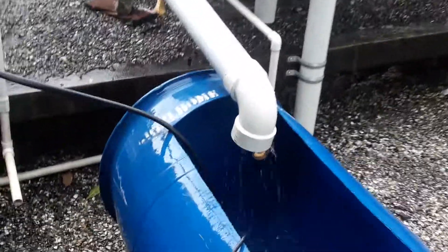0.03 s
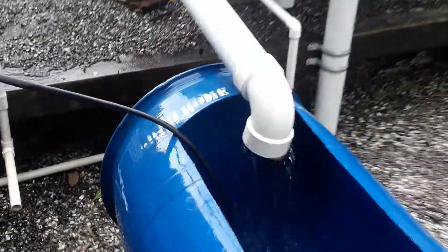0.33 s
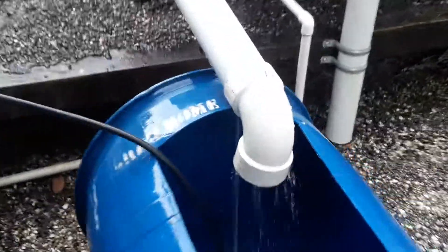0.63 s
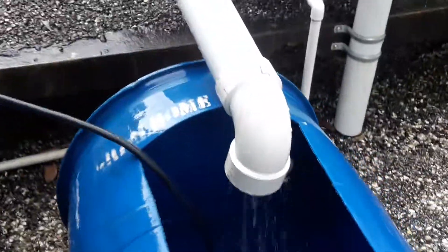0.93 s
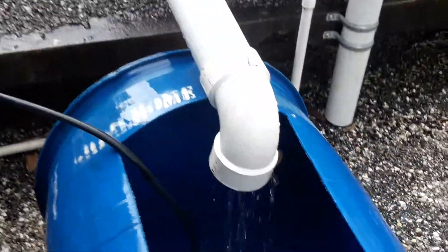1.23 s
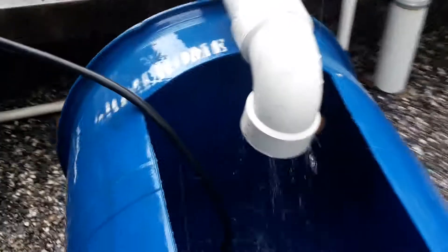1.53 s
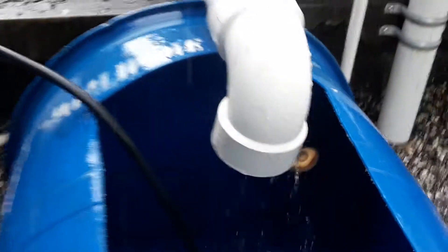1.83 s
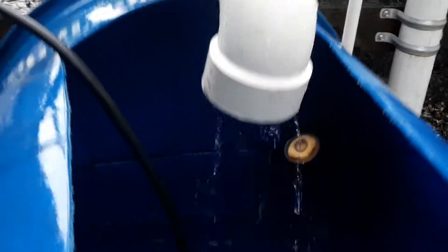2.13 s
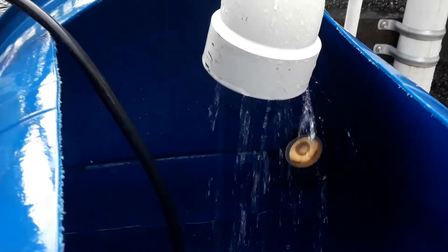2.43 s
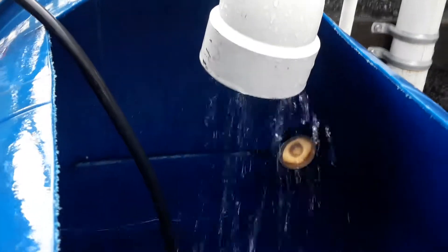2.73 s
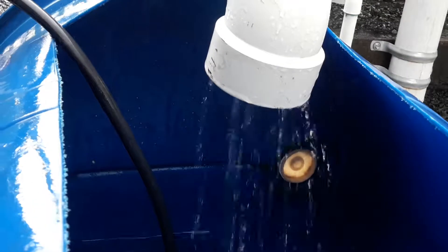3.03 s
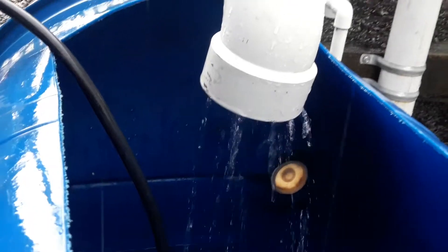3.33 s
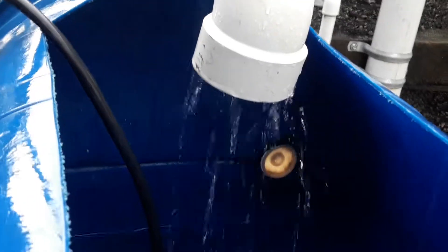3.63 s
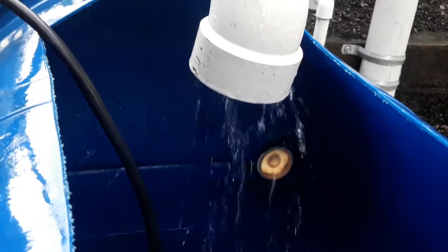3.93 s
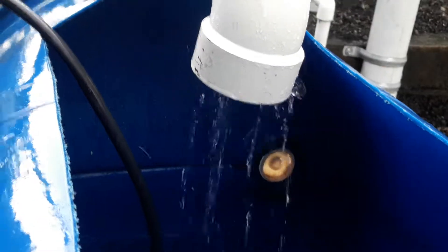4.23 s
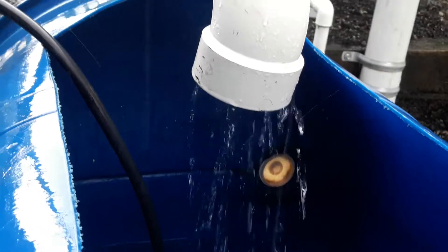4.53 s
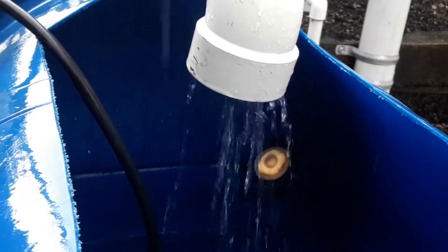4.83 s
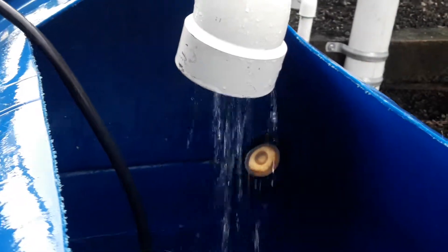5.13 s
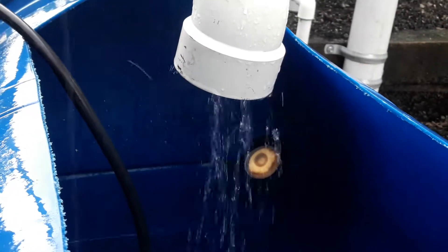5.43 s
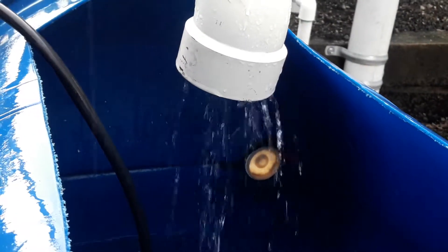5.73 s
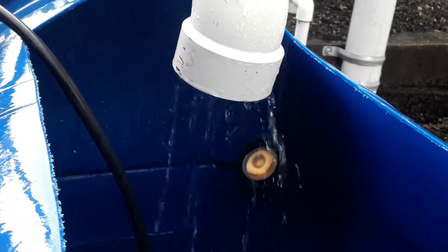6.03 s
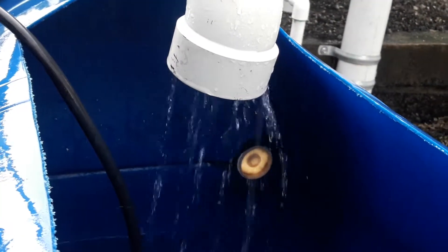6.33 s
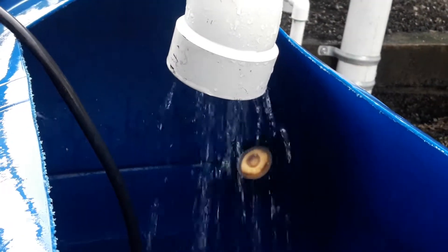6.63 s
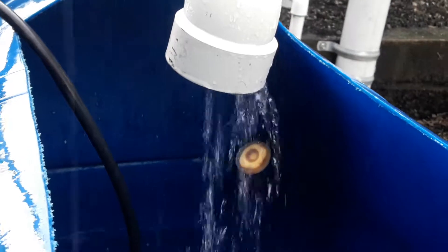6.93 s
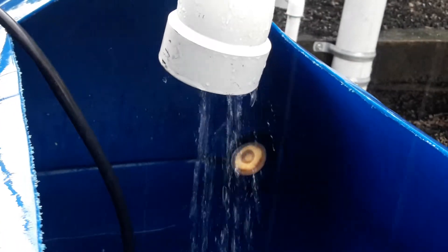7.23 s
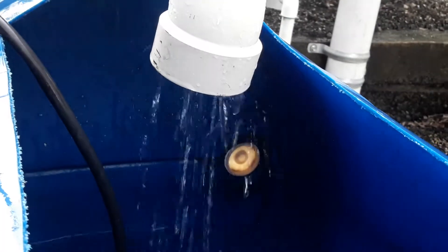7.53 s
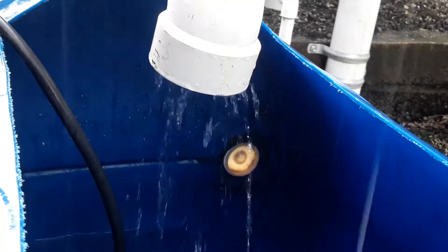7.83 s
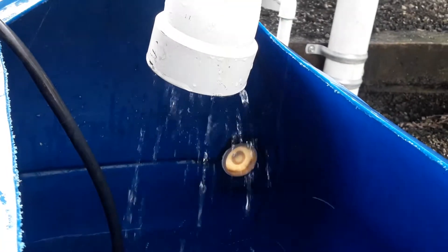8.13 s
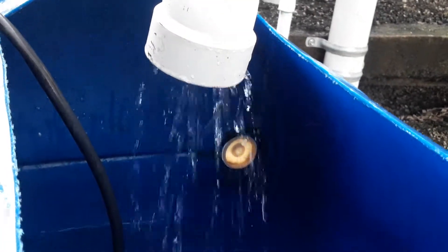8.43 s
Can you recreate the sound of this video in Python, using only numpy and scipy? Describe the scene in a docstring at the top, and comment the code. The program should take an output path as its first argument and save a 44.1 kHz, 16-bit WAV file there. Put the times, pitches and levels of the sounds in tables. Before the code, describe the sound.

Rainwater trickles from a pipe into a part-filled plastic barrel, a dense splashy patter with plinking drops and soft hollow drumming.

```python
"""At a part-filled plastic barrel, rainwater falls from a pipe in thin, broken strands.
Countless small splashes and bubbles patter between the walls, fat drops plink above them,
fine spray hisses and the barrel drums softly. A few drops knock on a camera close by;
after the hardest knock the whole sound sinks for a second and swells back."""
import sys
import numpy as np
from scipy import signal
from scipy.io import wavfile

SR = 44100
rng = np.random.default_rng(int(sys.argv[2]) if len(sys.argv) > 2 else 0)


def store_pcm(level_fs):
    """Save levels as 16-bit WAV."""
    pcm = np.round(np.clip(level_fs, -1, 1) * 32767).astype(np.int16)
    wavfile.write(sys.argv[1], SR, np.atleast_2d(pcm).T)


N = 383229
BINS_HZ = np.fft.rfftfreq(8192, 1 / SR)

# tone of water landing in the barrel (frequency [Hz], level [dB])
WATER_TONE = [(150, -28), (250, -6), (436, -5), (585, -4.5), (1040, -2.5), (1550, -3), (2560, -1),
              (3430, -7), (4450, -6.5), (4940, -3), (5480, -5.5), (7110, -16), (8610, -26), (12200, -19.5),
              (15800, -25)]
# tone of the barrel's low drumming (frequency [Hz], level [dB])
DRUM_TONE = [(15, -66), (25, -22), (107, 2.5), (139, 0), (220, 3.5), (264, -2.5), (450, -15), (580, -25),
             (990, -120)]
# pitches at which the barrel rings (frequency [Hz], width [Hz], boost [dB])
BARREL_RESONANCES = [(112.4, 21, 6), (162, 27, 2), (218.6, 18, 4.5), (612, 84, 3.5), (815, 21, 1.5),
                     (950, 140, 2), (2440, 680, 3), (3840, 580, 2.5), (4920, 310, 0)]
# peaks and dips of the microphone's opening (frequency [Hz], width [Hz], boost [dB])
MIC_RESONANCES = [(6980, 1530, 6), (8130, 1600, -4.5), (12960, 540, 1.5), (13800, 1300, -4),
                  (15500, 1000, 4)]
# how hard the water falls (time [s], strength compared with usual [dB])
FLOW = [(0, 1), (0.6, 1), (1.1, 2.5), (2.03, 1), (2.25, -1.0), (2.6, 0), (3.6, -0.5), (3.95, 1.5),
        (4.2, 0.5), (5.6, 0.5), (6.25, -1.0), (6.85, 2.5), (7.4, 1.5), (7.8, -0.5), (8.35, -0.5), (8.69, 1)]
# fat drops that each trap a bubble (time [s], pitch [Hz], level [dB], ring time [cycles])
PLINKING_DROPS = [ (.787, 3900, -23.5, .9), (.993, 3600, -19, .85), (1.008, 3000, -22.5, .6),
                  (1.136, 3470, -25, .9), (1.302, 2250, -22, 0.57), (1.55, 3860, -20, 0.72),
                  (1.701, 4830, -17, 1), (1.776, 4600, -22, 1.3), (1.926, 2330, -19.5, .6),
                  (1.927, 3800, -18.5, 0.82), (2.003, 5240, -12, .85), (2.015, 2290, -20.5, 3),
                  (2.06, 2070, -19.5, 1.8), (2.072, 2700, -19, 1.2), (2.46, 4370, -18.5, 1.6),
                  (2.469, 2200, -19, .4), (2.493, 4900, -16.5, .75), (2.5727, 2360, -13, 0.89),
                  (2.632, 2430, -20, 0.55), (2.666, 4300, -17, 0.72), (2.715, 5070, -18, 0.96),
                  (2.762, 7040, -24.5, 0.6), (2.822, 807, -25, 4.7), (2.85, 2920, -19.5, .5),
                  (2.854, 5860, -22.5, .8), (2.9648, 5400, -15, 1), (3.0455, 5430, -17.5, .7),
                  (3.135, 5060, -18.5, 1.2), (3.237, 1880, -19, 0.4), (3.238, 4200, -22, 0.36),
                  (3.376, 2600, -18, 0.69), (3.378, 5850, -22.5, 0.6), (3.874, 3090, -22, 0.23),
                  (4.045, 2510, -14, 0.92), (4.425, 793, -23, 3.1), (4.615, 3210, -7, 1.15),
                  (4.619, 5030, -17, .7), (5.045, 2750, -15.5, 0.7), (5.235, 2510, -20.5, 0.82),
                  (5.338, 3790, -22, 0.73), (5.517, 2780, -17, 2.5), (5.585, 6300, -26, 1.1),
                  (6.052, 2710, -22, 0.99), (6.124, 4100, -24.5, 0.88), (6.284, 2930, -23.5, 2.5),
                  (6.712, 2670, -20.5, 1.1), (6.815, 3750, -23, 1.8), (6.85, 1040, -26, 1.8),
                  (6.961, 3030, -16.5, 1.9), (7.036, 4800, -17, 0.47), (7.037, 2540, -19.5, .8),
                  (7.229, 3700, -20, 0.39), (7.377, 865, -23.5, 2), (7.443, 4730, -19.5, 0.29),
                  (7.589, 5400, -17.5, 0.6), (8.505, 4900, -18, 0.52), (8.641, 830, -24.5, 5)]
# flung droplets that shatter close by (time [s], level [dB], centre of the hiss [Hz])
HISSING_DROPS = [(1.147, -33, 13000), (1.35, -32, 13400), (1.603, -31, 11900), (1.85, -26, 12500),
                 (2.285, -28.5, 10400), (2.933, -31, 12500), (3.034, -26.5, 11300), (3.128, -33, 10500),
                 (3.38, -28.5, 11200), (3.412, -29, 12500), (3.562, -28, 12900), (3.861, -29, 12750),
                 (5.956, -32, 13000), (6.29, -31, 13500), (7.444, -34, 9650), (7.984, -31.5, 12300)]
# spray that slaps the rim (time [s], level [dB], pitch [Hz])
RIM_SLAPS = [(1.008, -5, 2500), (1.1121, 1, 800), (1.3611, -.5, 700), (1.4, -5, 2500), (1.534, -5, 700),
             (3.375, -3, 2400), (6.8903, 4.5, 1200), (7.963, -7, 1800), (8.098, -5, 1800)]
# drops that strike the camera's case (time [s], level [dB], final pitch [Hz])
CASE_KNOCKS = [(4.0315, -1, 107), (5.183, -17, 226), (5.205, -17, 456), (5.845, -25, 130),
               (6.221, -18.5, 426), (8.247, -13.5, 287), (8.268, -14, 670)]

# each layer's base level, and how many dB it gains when the flow gains 1 dB
DRUM_DB, DRUM_FOLLOWS = -44, 0.2
SPRAY_DB, PRICKLE_DB, SPRAY_FOLLOWS = -34, -49.5, 1.6
GURGLE_DB, GURGLE_FOLLOWS = -38.5, 1.5
FIZZ_DB, FIZZ_FOLLOWS = -27, 1.67
SPLASH_DB, SPLASH_FOLLOWS = -25, 0.74
# the camera moves in over the rim; from outside there is more drumming and less fizz
ARRIVE_S, OUTSIDE_DRUM_DB, OUTSIDE_FIZZ_DB = 2.7, 9, -8
DIP_DB, DIP_EXTRA_DRUM_DB = -14, -1  # how far the sound sinks after the hardest knock


def amp(db):
    """Turns decibels into a number to multiply by."""
    return 10 ** (np.asarray(db) / 20)


def unit(x):
    """Scales a sound to an average (rms) level of 1."""
    return x / np.sqrt(np.mean(x ** 2) + 1e-20)


def at_level(sound, db):
    """Gives a short sound the energy of 20 ms of steady sound at this level."""
    return amp(db) * sound / np.linalg.norm(sound) * np.sqrt(SR / 50)


def add(mix, start_s, sound):
    """Adds a sound to the mix at a given time."""
    part = mix[max(round(start_s * SR), 0):][:len(sound)]
    part += sound[:len(part)]


def boosts(resonances):
    """How many dB a set of resonances adds at each frequency."""
    return sum(db / (1 + (2 * (BINS_HZ - hz) / width) ** 2) for hz, width, db in resonances)


def filtered(x, db):
    """Turns each frequency up or down, with no ringing ahead of a click."""
    log_gain = np.log(amp(np.r_[db, db[-2:0:-1]]))
    response = np.exp(np.conj(signal.hilbert(log_gain)))  # minimum phase
    taps = np.fft.ifft(response).real[:len(db)]
    return signal.oaconvolve(x, taps)[:N]


def in_barrel(x, tone):
    """Shapes a sound with a tone table and the barrel's resonances; rms 1."""
    hz, db = np.transpose(tone)
    tone_db = np.interp(np.log(BINS_HZ + 1), np.log(hz), db)
    return unit(filtered(x, tone_db + boosts(BARREL_RESONANCES)))


def wall_echoes(echo_db, first_s=0.0013, fade_60db_s=0.12):
    """The direct sound and its quick echoes round the barrel, different for every landing spot."""
    t = np.arange(SR // 6) / SR
    fade = np.exp(-np.log(1000) * t / fade_60db_s)
    echoes = rng.choice([-1, 1], len(t)) * (rng.random(len(t)) < 0.1) * (t > first_s) * fade
    response = amp(echo_db) * echoes / np.linalg.norm(echoes)
    response[0] = 1
    return response


def impacts(per_s, spread_db, cap):
    """Clicks at random moments: most are near size 1, a few differ by up to cap times spread_db."""
    size = amp(spread_db * np.minimum(rng.exponential(1, N), cap))
    return size * rng.choice([-1, 1], N) * (rng.random(N) < per_s / SR)


def scatter(sound, per_s, spread_db, cap):
    """Repeats a sound at random moments and strengths."""
    return signal.oaconvolve(impacts(per_s, spread_db, cap), sound)[:N]


def bubble(hz, cycles, rise=0.0039):
    """A bubble swells, rings for a few cycles and rises slightly in pitch; energy 1."""
    age = np.arange(int(12 * cycles * SR / hz) + 2) * hz / (SR * cycles)
    phase = 2 * np.pi * cycles * age * (1 + rise * (age / 2 - 2))
    ring = age ** 2 * np.exp(-age) * np.sin(phase)
    return ring / np.linalg.norm(ring)


def shatter(hz, cycles, fade_s, samples):
    """A droplet breaks up: a fading burst of noise with the tone of a tiny bubble."""
    t = np.arange(samples) / SR
    return np.convolve(bubble(hz, cycles), rng.standard_normal(samples) * np.exp(-t / fade_s))


def slap(hz):
    """One quick push and pull of air, strongest near hz."""
    age = 2 * np.pi * hz * np.arange(SR // 100) / SR
    lowpass = signal.butter(2, min(4 * hz, SR / 2 - 1), fs=SR, output="sos")
    return signal.sosfilt(lowpass, (1 - age) * np.exp(-age))


def plink(hz, db, cycles, splash_db=-13):
    """One drop makes a bubble and a brief splash, and the walls throw both back."""
    drop = np.r_[bubble(hz, cycles), np.zeros(SR // 100)]
    splash = shatter(hz=3300, cycles=0.5, fade_s=0.0012, samples=SR // 100)
    add(drop, 0, amp(splash_db) * splash / np.linalg.norm(splash))
    return at_level(np.convolve(drop, wall_echoes(echo_db=6)), db)


def drumming():
    """The falling water shakes the plastic shell and the air inside it."""
    return in_barrel(impacts(per_s=600, spread_db=3.5, cap=4.9), DRUM_TONE)


def prickling():
    """The finest droplets land close by as tiny pinpricks with little echo."""
    prick = np.convolve(bubble(hz=11500, cycles=0.66), wall_echoes(echo_db=-3))
    return unit(scatter(prick, per_s=14, spread_db=3.5, cap=2.7))


def spraying(low_hz=5200, high_hz=15000):
    """Flung droplets shatter as they land, each in a tiny burst of bright fizz."""
    out = np.zeros(N)
    for hz in np.geomspace(low_hz, high_hz, 12):
        burst = shatter(hz, cycles=0.38, fade_s=0.0074, samples=SR // 20)
        out += np.sqrt(hz) * unit(scatter(burst, per_s=4, spread_db=3, cap=2.6))
    return in_barrel(out, WATER_TONE)


def spitting():
    """Now and then a large flung droplet shatters with a bright hiss."""
    out = np.zeros(N)
    for start_s, db, hz in HISSING_DROPS:
        burst = shatter(hz, cycles=0.65, fade_s=0.016, samples=SR // 12)
        add(out, start_s, at_level(burst, db))
    return out


def gurgling(low_hz=520, high_hz=1700):
    """Large, low bubbles ring where the strands of water plunge deep."""
    out = np.zeros(N)
    for hz in np.geomspace(low_hz, high_hz, 18):
        ring = np.convolve(bubble(hz, cycles=1.7), wall_echoes(echo_db=-1))
        out += unit(scatter(ring, per_s=7, spread_db=3, cap=1.5))
    return in_barrel(out, WATER_TONE)


def stray_drops(per_s=5, low_hz=2090, high_hz=5600, sizes=16):
    """Smaller drops plink softly at random moments."""
    out = np.zeros(N)
    for hz in np.geomspace(low_hz, high_hz, sizes):
        drop = plink(hz, db=-26, cycles=1.16)
        out += scatter(drop, per_s / sizes, spread_db=-0.5, cap=2.2)
    return out


def fizzing(low_hz=1700, high_hz=15000):
    """Small bubbles of many sizes ring at random; the smaller the bubble, the higher its pitch."""
    out = np.zeros(N)
    for hz in np.geomspace(low_hz, high_hz, 44):
        cycles = 0.59 * 2 ** rng.uniform(-0.46, 1)
        ring = np.convolve(bubble(hz, cycles), wall_echoes(echo_db=5))
        out += np.sqrt(hz) * unit(scatter(ring, per_s=26, spread_db=3, cap=2.6))
    return in_barrel(out, WATER_TONE)


def rim_slaps(snap_db=-12, snap_hz=5500, ring_db=-12, ring_hz=2600, ring_s=0.0007):
    """Spray slaps the nearby rim with a bright snap and a short ring of plastic."""
    out, t = np.zeros(N), np.arange(SR // 100) / SR
    snap = amp(snap_db) * slap(snap_hz)
    ring = amp(ring_db) * np.exp(-t / ring_s) * np.sin(2 * np.pi * ring_hz * t)
    for start_s, db, hz in RIM_SLAPS:
        hit = slap(hz) - snap + ring
        add(out, start_s, amp(db) * np.convolve(hit, wall_echoes(echo_db=-7)))
    return out


def case_knocks(knock_hz=1300, knock_db=-2, knock_s=0.00054, glide_s=0.00071,
                thud_db=-6, thud_s=0.0094, crack_db=4, crack_delay_s=0.00054):
    """A drop hits the camera's case: a cracking knock that falls to a thud as the drop flattens."""
    out, t = np.zeros(N), np.arange(SR // 20) / SR
    force = amp(knock_db) * np.exp(-t / knock_s) + amp(thud_db) * np.exp(-(t / thud_s) ** 4)
    for start_s, db, thud_hz in CASE_KNOCKS:
        pitch_hz = thud_hz + (knock_hz - thud_hz) * np.exp(-t / glide_s)
        phase = 2 * np.pi * np.cumsum(pitch_hz) / SR
        add(out, start_s, amp(db) * force * np.sin(phase))
        add(out, start_s + crack_delay_s, -amp(db + crack_db) * slap(hz=2800))
    return out


def fat_drops():
    """Fat drops trap bubbles whose plinks stand out of the patter."""
    out = np.zeros(N)
    for start_s, hz, db, cycles in PLINKING_DROPS:
        add(out, start_s, plink(hz, db, cycles))
    return out


def splashing(strands=10):
    """The main patter: each strand of water breaks into drops that slap the surface at its own spot."""
    out = np.zeros(N)
    for _ in range(strands):
        out += scatter(wall_echoes(echo_db=5), per_s=170, spread_db=3, cap=2.8)
    return in_barrel(out, WATER_TONE)


def level_dip(t, start_s=3.975, fall_s=0.52, hold_s=0.63, recover_s=0.45):
    """How far the sound has sunk, from 0 to 1: it falls steadily, stays low, then eases back."""
    fall = np.clip((t - start_s) / fall_s, 0, 1)
    since_hold_s = np.maximum(t - start_s - fall_s - hold_s, 0)
    return fall * np.exp(-since_hold_s / recover_s)


def scene():
    """The patter follows the flow of water, single drops stand out, and the whole sound dips once."""
    t = np.arange(N) / SR
    flow_db = np.interp(t, *np.transpose(FLOW))
    sunk = level_dip(t)
    outside = np.maximum(1 - t / ARRIVE_S, 0)
    drum_db = DRUM_DB + DRUM_FOLLOWS * flow_db + OUTSIDE_DRUM_DB * outside + DIP_EXTRA_DRUM_DB * sunk
    drum = amp(drum_db) * drumming()
    spray = amp(SPRAY_FOLLOWS * flow_db) * (amp(SPRAY_DB) * spraying() + amp(PRICKLE_DB) * prickling())
    gurgle = amp(GURGLE_DB + GURGLE_FOLLOWS * flow_db) * gurgling()
    fizz = amp(FIZZ_FOLLOWS * flow_db) * (amp(FIZZ_DB) * fizzing() + stray_drops())
    splash = amp(SPLASH_DB + SPLASH_FOLLOWS * flow_db) * splashing()
    patter = drum + gurgle + amp(OUTSIDE_FIZZ_DB * outside) * (spray + fizz) + splash
    single_drops = spitting() + rim_slaps() + case_knocks() + fat_drops()
    return (amp(DIP_DB * sunk) * (patter + single_drops))[None]


def record(dry):
    """The microphone's opening colours the treble; overloud peaks and the highest treble are cut off."""
    coloured = filtered(dry[0], boosts(MIC_RESONANCES))
    top_hz = 15850
    lowpass = signal.firwin(511, top_hz, window=("kaiser", 9), fs=SR)
    return signal.oaconvolve(np.clip(coloured, -1, 1), lowpass, "same")[None]


dry = scene()
out = record(dry)
store_pcm(out)
```